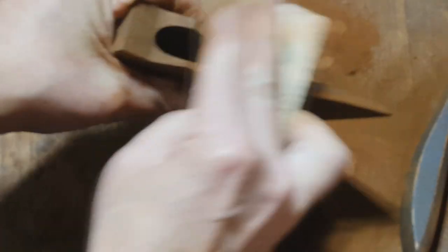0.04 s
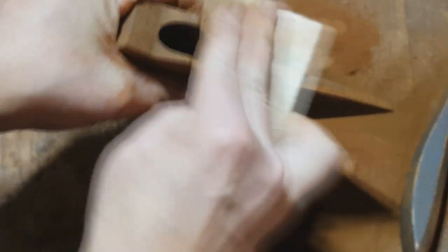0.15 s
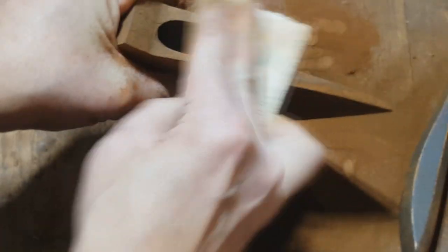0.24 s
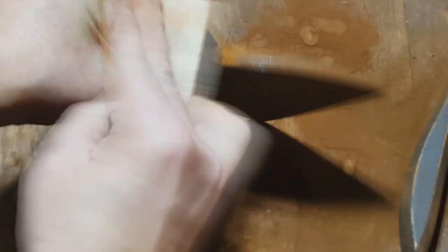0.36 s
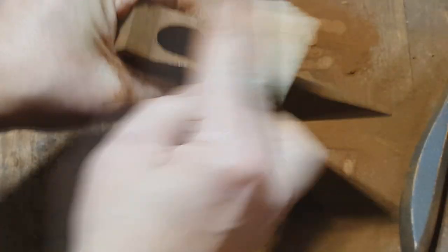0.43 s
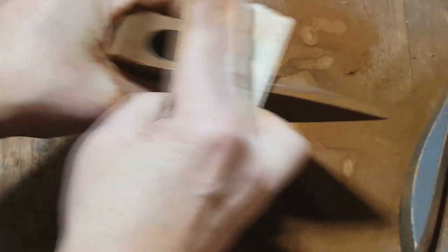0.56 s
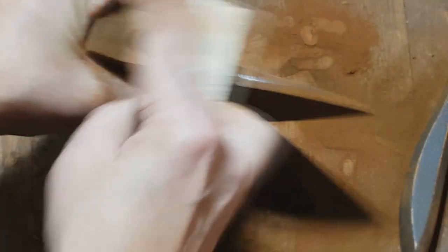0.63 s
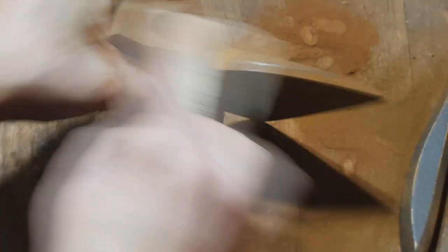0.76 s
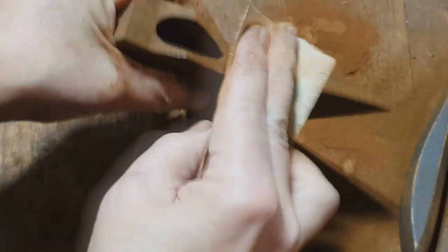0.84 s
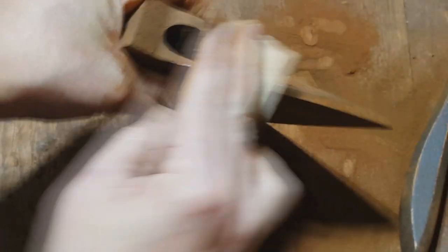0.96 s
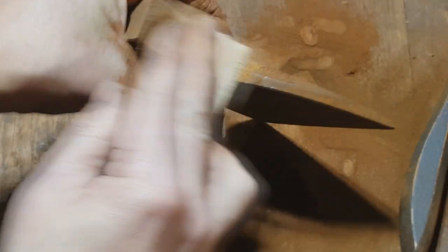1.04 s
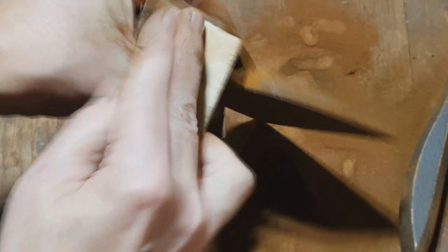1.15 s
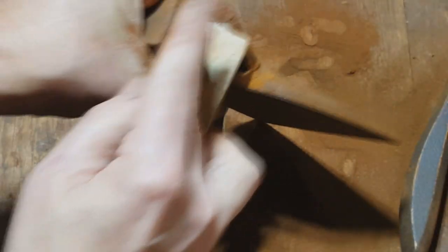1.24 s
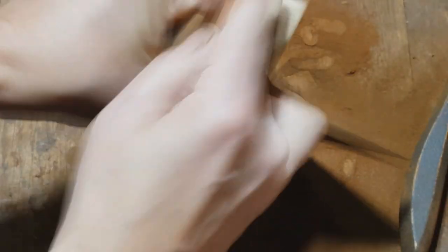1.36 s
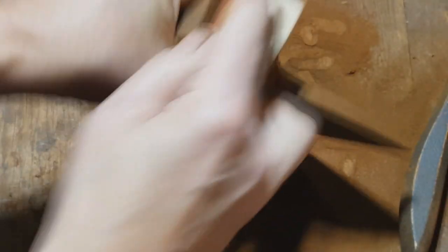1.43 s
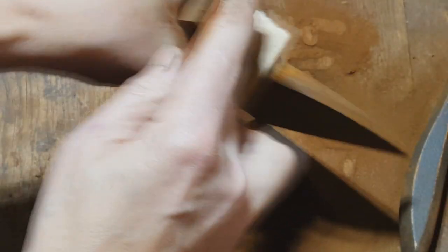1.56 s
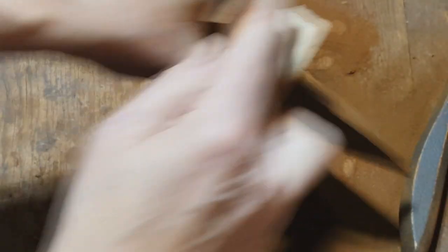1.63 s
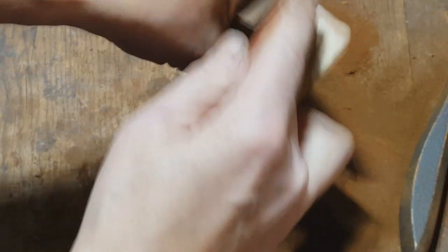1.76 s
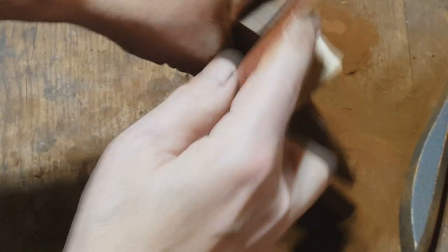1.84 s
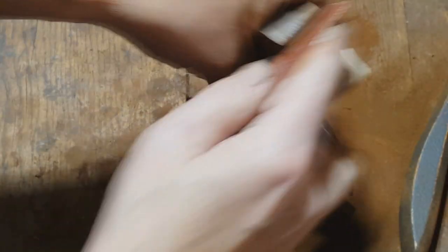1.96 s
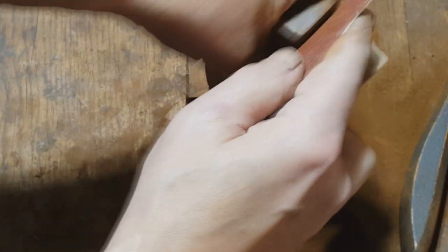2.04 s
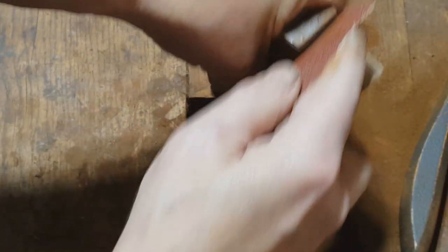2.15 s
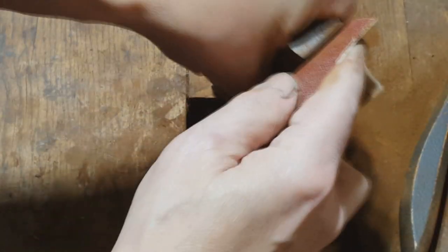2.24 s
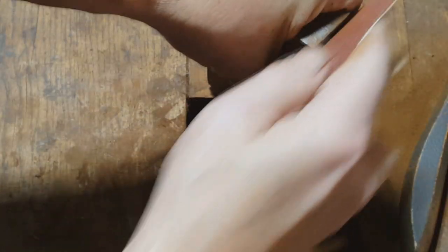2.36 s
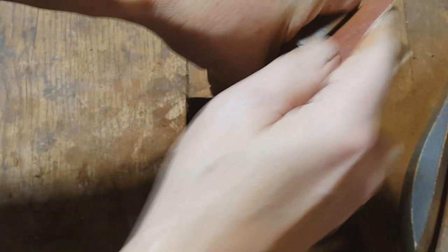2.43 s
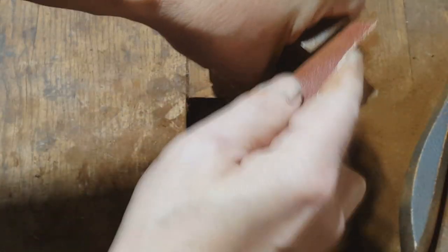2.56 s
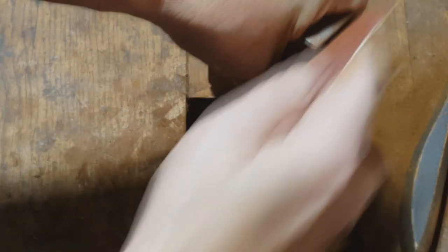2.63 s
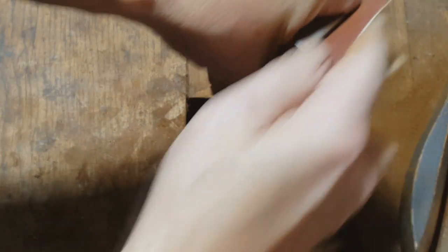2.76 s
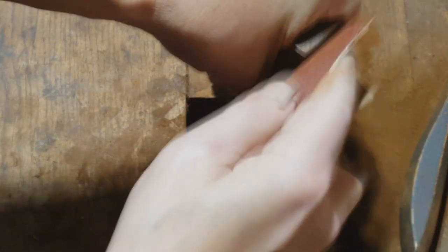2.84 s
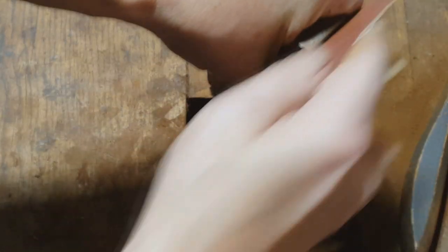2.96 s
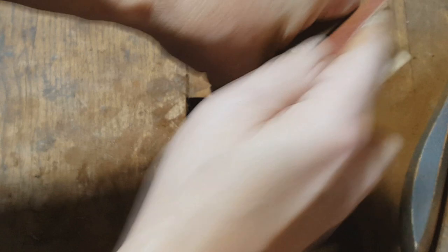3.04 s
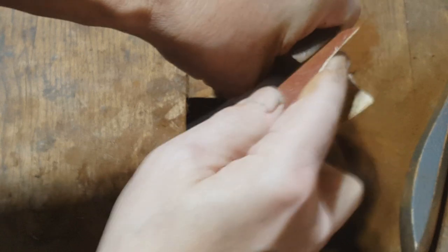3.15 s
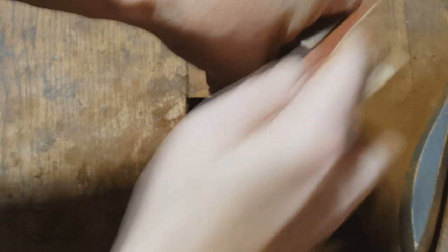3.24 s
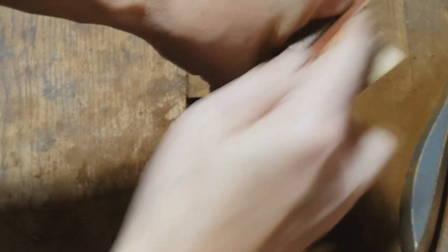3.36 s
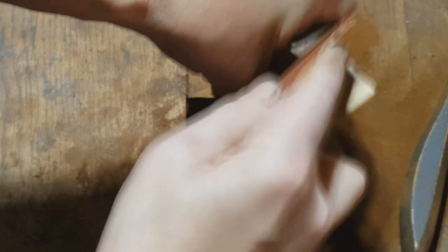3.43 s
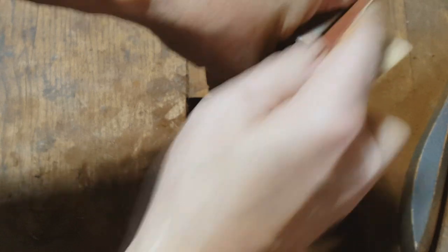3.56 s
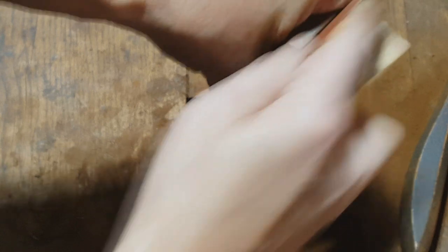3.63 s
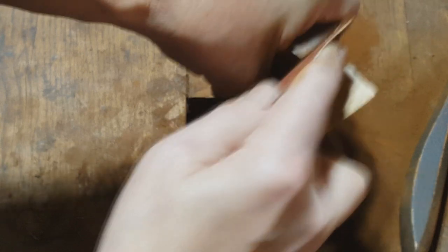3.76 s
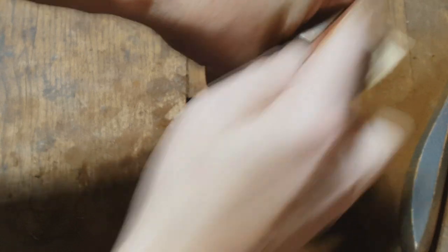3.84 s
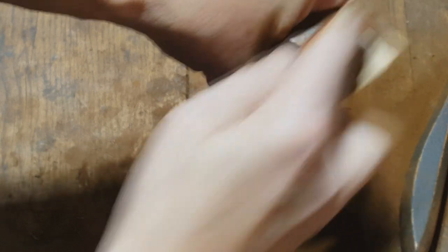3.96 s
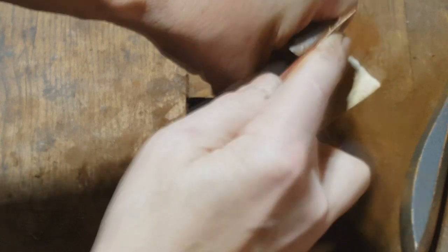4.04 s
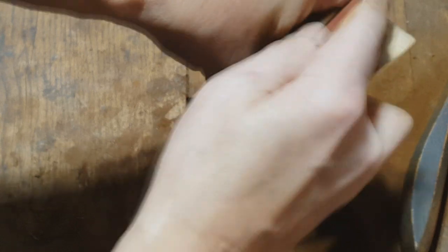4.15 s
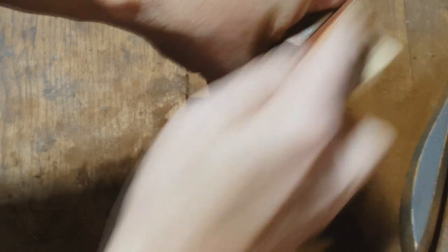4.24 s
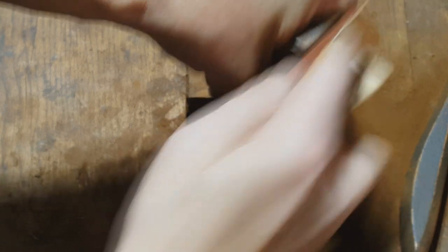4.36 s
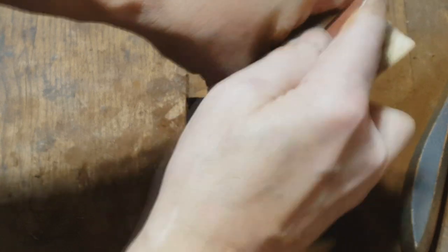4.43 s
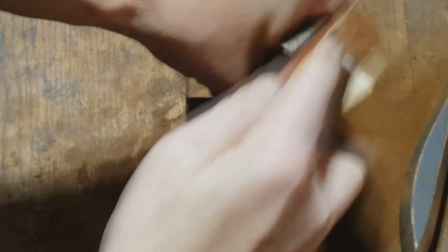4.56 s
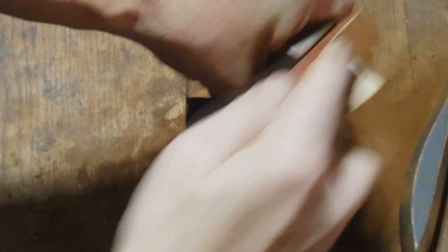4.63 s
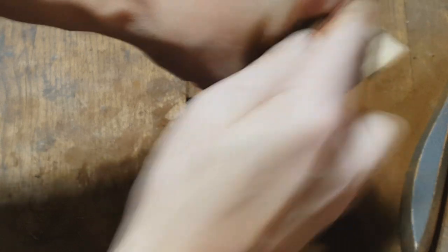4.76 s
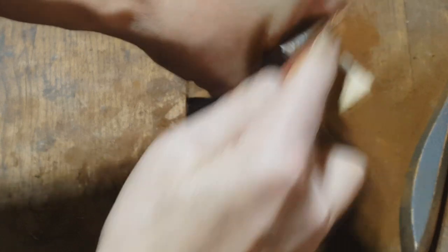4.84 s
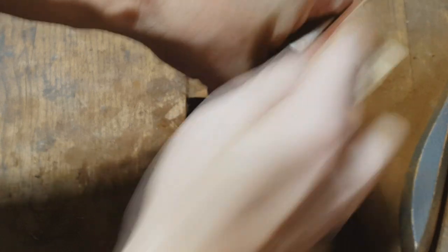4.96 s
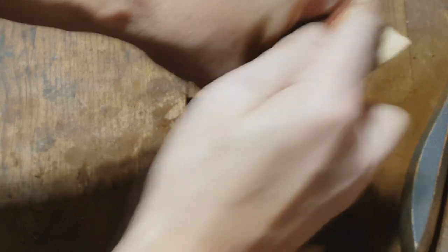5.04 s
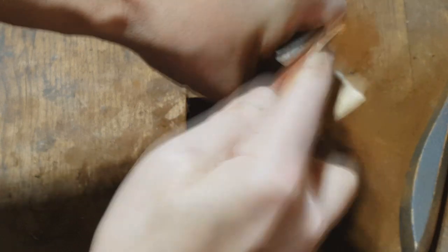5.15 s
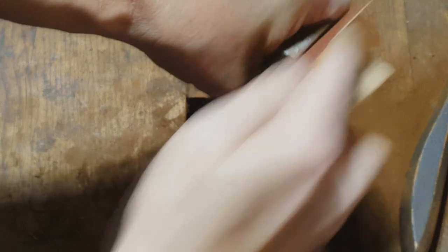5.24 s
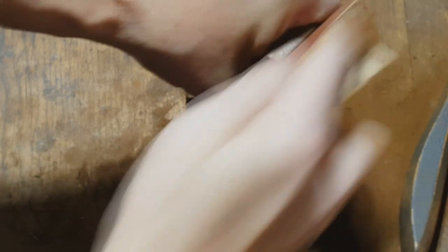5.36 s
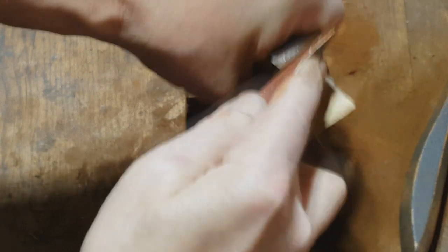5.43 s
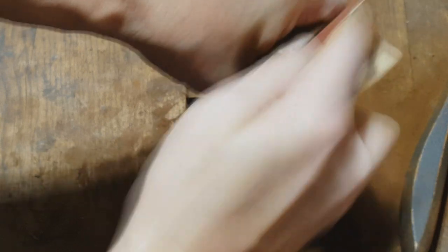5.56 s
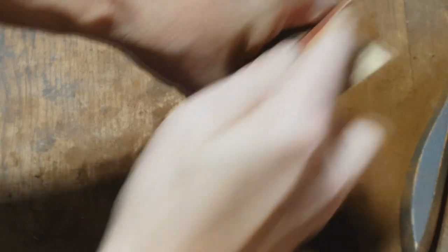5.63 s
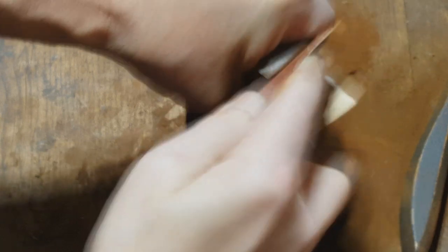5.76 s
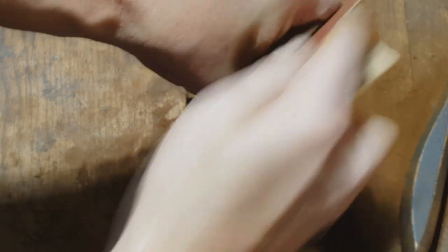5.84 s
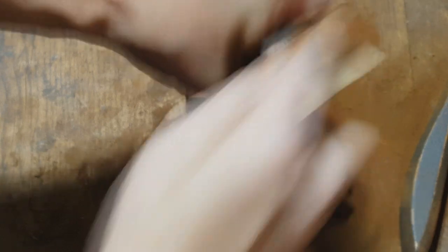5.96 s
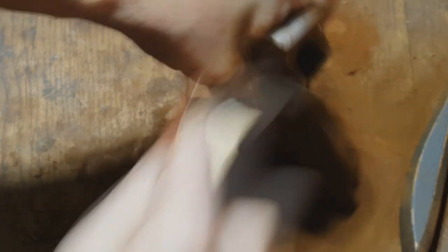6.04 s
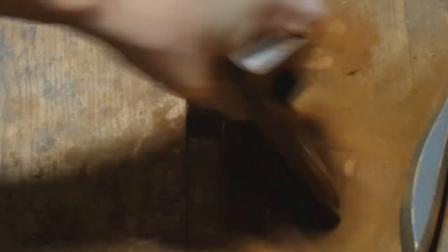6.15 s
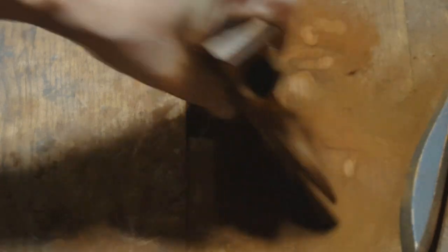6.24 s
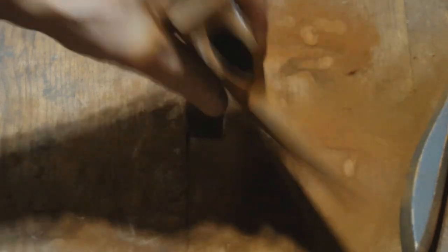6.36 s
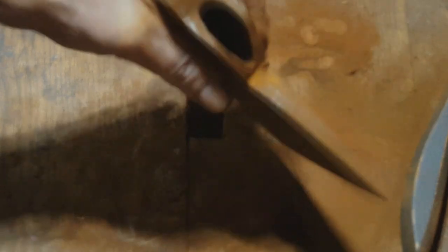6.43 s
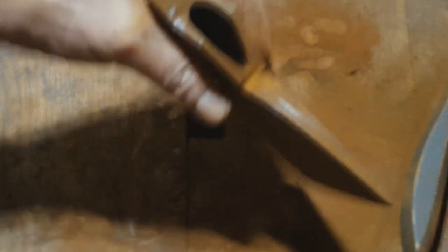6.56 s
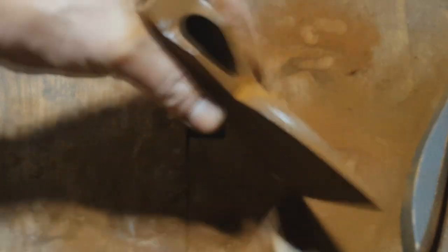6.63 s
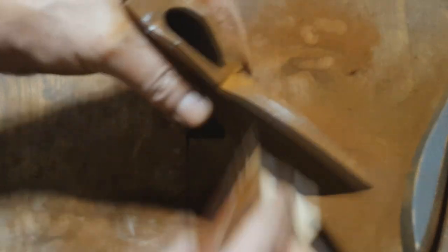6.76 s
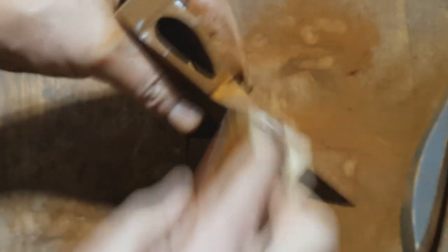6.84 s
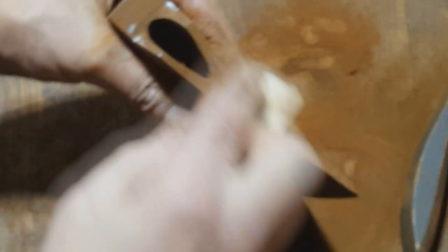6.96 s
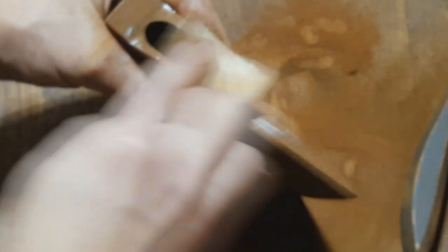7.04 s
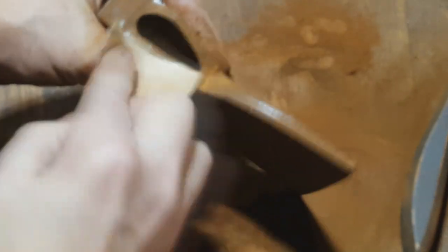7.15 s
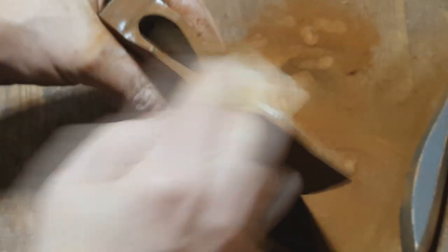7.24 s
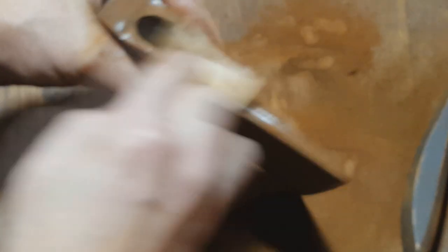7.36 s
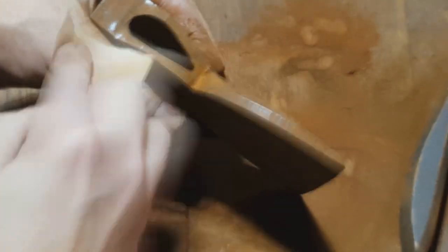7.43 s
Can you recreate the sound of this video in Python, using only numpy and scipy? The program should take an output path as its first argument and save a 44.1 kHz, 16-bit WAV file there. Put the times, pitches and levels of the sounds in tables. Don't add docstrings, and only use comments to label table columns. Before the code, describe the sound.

Sandpaper scrapes a hollow-eyed steel tool head in sharp bursts, then rapid even rubbing, before the head thumps on wood and two loud scrapes follow.

```python
import sys
import numpy as np
from scipy import signal
from scipy.fft import rfft, irfft, next_fast_len
from scipy.io import wavfile
from scipy.ndimage import uniform_filter1d, map_coordinates

SR = 44100
rng = np.random.default_rng(int(sys.argv[2]) if len(sys.argv) > 2 else 0)


def unload_audio(sound):
    columns = np.transpose(np.atleast_2d(sound))
    steps = np.round(np.clip(columns, -1, 1) * 32767)
    wavfile.write(sys.argv[1], SR, steps.astype(np.int16))


def ratio_of_db(decibels):
    return 10 ** (np.asarray(decibels, float) / 20)


N = 330309
TIME = np.arange(N) / SR

# start_s, length_s, peak_db, top_speed_at (0-1), eye_db
SINGLE_STROKES = [(-0.04, 0.097, -26, 0.67, -4), (0.048, 0.042, -19, 0.68, -18.5),
                  (0.114, 0.045, -23.5, 1, -15), (0.264, 0.011, -32, 0.26, 7),
                  (0.318, 0.16, -25.5, 0.67, -5), (0.672, 0.023, -56.5, 0.98, -1.5),
                  (1.024, 0.08, -23.5, 0.75, -7.5), (1.12, 0.15, -29, 0.56, -7),
                  (1.319, 0.11, -40, 0.74, -15.5), (1.472, 0.026, -49.5, 0.36, 1.5),
                  (1.496, 0.092, -45, 0.68, -4), (1.654, 0.073, -40.5, 0.74, 1),
                  (6.787, 0.095, -30.5, 0.61, -4), (7.053, 0.036, -27, 0.29, -11),
                  (7.086, 0.082, -29, 0.41, -8.5)]
# start_s, length_s, peak_db
RUN = [(2.042, 0.11, -35.5), (2.188, .12, -34), (2.346, 0.1, -32.5), (2.487, 0.1, -33), (2.639, .1, -31),
       (2.778, 0.11, -29.5), (2.946, 0.095, -29.5), (3.081, 0.1, -30), (3.235, 0.091, -29),
       (3.369, 0.099, -29), (3.533, 0.091, -26), (3.659, 0.095, -28), (3.812, 0.09, -26.5),
       (3.943, 0.095, -29), (4.083, 0.096, -26.5), (4.229, 0.096, -28.5), (4.371, 0.086, -27),
       (4.493, 0.1, -29.5), (4.655, 0.089, -26.5), (4.787, .11, -28), (4.939, 0.087, -27.5),
       (5.058, .12, -29.5), (5.22, 0.097, -27.5), (5.355, 0.11, -30), (5.514, 0.093, -27.5),
       (5.646, 0.13, -26.5)]
# top_speed_at (0-1), eye_db, fizz_db
PUSH = (0.73, -1.9, -4)
PULL = (0.43, -2.3, -4.5)
# top_speed_shift (0-1), eye_db
RUN_VARIATION = [(0.03, 0.0), (0, 1.5), (0.0, 1), (0.08, 1.5), (0.02, 1), (0, 1), (0, 1.5), (0, -1.5),
                 (0.01, 1), (0.06, -0.5), (0, -1.5), (0.03, 1.0), (0.03, 0), (0, -2), (0.09, 2), (-0.12, 1),
                 (0.04, 0), (0.02, 0), (0, 1), (0, 0.5), (0.02, 1), (0.01, 0.5), (0, -1.5), (0, 1.5),
                 (0.05, 0), (0, 0.5)]
RUN_EYE_TILTS = [.5, 1.5, 1, .5, .5, -.5, .5, .5, 2, 2, .5, -.5, .5, -.5, .5, -.5, -.5, -.5, -.5, .5, .5,
                 -.5, -.5, -.5, -.5, -.5]
START_DELAYS = [0.00074, 0.0034]
# eye_early_db, eye_late_db, grit_early_db, grit_late_db (tilt to the treble)
SINGLE_SLIDES = [(-2, 0, -1.5, 4), (5, 6.5, 4.5, -3), (7, 3.5, -5, -0.5), (4.5, 0, -8.5, -1),
                 (-1, 3.5, 4, -1.5), (0, 4, -6, -2.5), (1.5, -5.5, 2, -2.5), (-2.0, -6, -1.5, 2),
                 (8, -1.0, -1, 1.5), (3, 1, 0.5, 0.0), (1, 5.0, 1.5, 1.5), (-2, 2, 2, 0.0),
                 (1.5, 0, 3, 0.5), (-2.0, -4, 0, -5), (1, -2, 1.5, -2.5)]
PUSH_SLIDE = (-1.9, -1.2, -2.4, .7)
PULL_SLIDE = (-.3, 0.6, 0.5, -1)
GRIP_CHANGES = [
    1.44,
    6.3,
]
STROKE_FIZZ = [-10, -6, -4.5]
TOUCH_FIZZ = [-7.5, -1, -4.5]
# peak_s, peak_db, rise_db_per_s, fall_db_per_s, eye_db
TOUCHES = [(0.519, -55, 900, 157, -1), (0.735, -51, 403, 218.5, 1), (0.917, -44, 602, 293, -13),
           (1.021, -43.5, 1402, 901, -5), (1.725, -38, 900, 360, -3), (1.85, -65, 40, 104, -9),
           (1.922, -48.5, 176, 280, 6.5), (1.96, -48.5, 150, 502, -15), (2.055, -50, 593, 900, -8),
           (5.85, -70, 898, 300, 11), (5.97, -73, 30.5, 59, 9), (6.05, -66.5, 59, 137, 1),
           (6.218, -73, 800, 253, -6), (6.371, -52, 2499, 250, -1), (6.461, -61, 46, 500, -4),
           (6.65, -61, 630, 830, 5), (6.694, -77, 480, 240, 12), (6.755, -37.5, 5997, 700, 3.5),
           (6.798, -50.5, 284, 1496, 6), (6.95, -68, 900, 618, -10), (6.992, -57.5, 1200, 500, -1),
           (7.25, -83, 900, 168, -4), (7.312, -68.5, 120, 221, -1)]
# time_s, low_grit_db
PRESS = [(0, -16.5), (.3, -6.5), (.45, -25.5), (.75, -12), (.92, 1), (1.15, -20), (1.38, 2), (1.5, -9.5),
         (1.9, -4), (2.4, -14.5), (4.6, -17.5), (5.95, -15), (6.03, 4.5), (6.5, 2), (6.85, -14.5),
         (7.49, -22)]
# freq_hz, density_db (per Hz)
EYE_SIDE_COLOUR = [(88, -51), (150, -17), (422, -5.5), (805, -6.5), (871, -12), (941, -11.5), (1080, -12.5),
                   (1600, -6.5), (1870, -14), (5250, -17.5), (10000, -21), (12900, -19.5), (16000, -25.5)]
CHEEK_COLOUR = [(100, -70.5), (170, -27), (253, -26), (337, -12.5), (392, -15), (596, -10), (996, -21),
                (1400, -6), (1570, -6), (2300, -7), (3630, -6.5), (10500, -19.5), (12700, -18),
                (16000, -26)]
BLADE_COLOUR = [(150, -64.5), (250, -31), (348, -16.5), (414, -19), (618, -10), (1180, -11.5), (1550, -6),
                (1760, -11), (2860, -1.5), (4650, -13.5), (9010, -10.5), (10000, -17), (16000, -15.5)]
# freq_hz, width_hz, level_db
HELD_STEEL = [(814, 17, 4), (934, 23, 1.5), (1605, 290, -8.5), (2120, 81, -54), (3190, 3.3, 9),
              (3624, 7.7, -7.5), (5100, 290, -19), (6000, 55, -21.5), (323, 6.7, -1)]
# start_s, length_s, level_db, from_hz, to_hz
SWISHES = [(.035, 0.051, -26.5, 4970, 5470), (0.062, 0.052, -26.5, 2900, 3220),
           (0.137, 0.037, -35, 2490, 3545), (0.377, 0.079, -27.5, 6000, 4550),
           (0.418, 0.063, -31, 3846, 1908), (1.062, .045, -28, 3870, 3080), (1.168, 0.081, -37, 4300, 3550),
           (6.808, 0.073, -33, 1683, 2506), (7.052, 0.033, -33, 2720, 3300),
           (7.096, 0.067, -31, 1900, 2690), (7.097, 0.037, -37.5, 8540, 7960)]
# level_db (against the stroke), from_hz, to_hz
PUSH_WHISTLE = (-7.5, 1620, 1380)
PULL_WHISTLE = (-6.5, 1450, 1720)
# time_s, peak_db, crack_db
TAPS = [(.0812, -20.5, -5), (.2654, -3, -11.5), (.2725, -20, -6.5), (.4255, -13.5, -1.5), (.4705, -15.5, 3),
        (1.3492, -22, 6.5), (1.4802, -53, 7), (4.7342, -39, 0.5), (5.7452, -7, 1), (5.741, -17.5, 0),
        (6.7504, -18.5, 2), (7.0504, -14, 9), (7.0702, -13, 0.5), (7.119, -28, 5), (7.15, -23, 4)]
# freq_hz, level_db, t60_s
EYE_MODES = [(380, -11, .015), (620, -8, .012), (926, -4, .015), (1250, -1.5, .012), (1604, -1.5, .018),
             (1900, -7, .008)]
# time_s, peak_db
THUDS = [
    (6.365, -16),
    (6.3725, -37),
    (6.3835, -23.5),
    (6.3895, -25),
    (6.4005, -29.5),
    (6.419, -41),
    (6.431, -44),
    (6.4445, -40),
]
# freq_hz, level_db, t60_s
BENCH_MODES = [(70, -15, .1), (100, -8, .09), (135, -3, .09), (200, -4, .05), (264, -2.5, .035),
               (340, -1.5, .035), (450, -8, .03), (700, -19, .03), (1200, -32, .03)]
# time_s, peak_db
BUMPS = [
    (1.422, -33),
    (1.446, -33),
    (1.534, -29),
    (1.553, -33),
    (6.322, -46),
]
# freq_hz, level_db, t60_s
SOFT_BENCH_MODES = [(120, -2, .07), (160, -3, .06), (230, -9, .04)]
# time_s, peak_db
NUDGES = [
    (6.012, -43),
    (6.027, -40),
    (6.043, -40),
    (6.058, -41),
    (6.09, -49),
]
# start_s, freq_hz, level_db, t60_s
LIFTED_STEEL = [(6.02, 1787, -70, .1), (6.018, 2396, -54, .14), (6.03, 2880, -58, .24),
                (6.03, 4295, -66, .16), (6.042, 5771, -60, .17), (6.015, 6514, -67, .11),
                (6.03, 8625, -70, .26), (6.028, 10083, -70, .15)]
# freq_hz, level_db, t60_s
LANDED_STEEL = [(2880, -57, .12), (4400, -51, .13), (5771, -56, .1), (6600, -49, .05), (7000, -54, .1),
                (8625, -54, .1), (10500, -56, .05)]
# time_s, peak_db, pitch_hz
TICKS = [(1.83, -38, 11000), (6.212, -66, 5950), (6.324, -59, 1100), (6.345, -64, 2500),
         (6.506, -50.5, 2100), (6.527, -34, 8900), (6.5275, -55, 13000), (6.5475, -49, 3220),
         (6.635, -57, 1975), (6.649, -48, 3000), (6.684, -49.5, 3300), (6.685, -52, 1900),
         (6.698, -50, 2600), (6.733, -54, 2600), (6.72, -65, 2000)]
# time_s, peak_db, pitch_hz
SNAGS = [(.0588, -17, 1610), (.1431, -18.5, 1700), (.1526, -20, 2780), (.3468, -28.5, 1490),
         (.3643, -14.5, 1770), (1.0328, -47, 1540), (1.0447, -38, 1400), (1.0537, -23, 3800),
         (1.0662, -19, 1410), (1.081, -16, 1580), (1.0905, -17, 3000), (1.14, -27, 1740),
         (1.1789, -15, 1500), (1.197, -20, 4500), (1.5422, -28, 4070), (1.6684, -44, 4790),
         (1.6864, -38, 4480), (1.8351, -40, 12100), (1.8695, -46, 4040), (1.8949, -45, 4160),
         (1.9523, -27, 8840), (6.8008, -30.5, 2100), (6.8208, -15.5, 2660), (6.8262, -14.5, 1560),
         (6.842, -16, 1890), (6.854, -28, 2500), (7.0613, -19.5, 3200), (7.0673, -12.5, 3480),
         (7.0982, -19.5, 2590), (7.127, -14.5, 2100)]
# freq_hz, t60_s
ROOM_DECAY = [(150, 0.38), (900, 0.27), (1400, 0.18), (2500, 0.24), (5000, 0.19), (14000, 0.19)]
# freq_hz, density_db (per Hz)
AIR_COLOUR = [(12, -44.5), (20, -16), (27, -20.5), (101, -20.5), (113, -26), (134, -25), (172, -12.5),
              (1030, -31), (1710, -29.5), (6180, -42.5), (10200, -52.5), (12800, -47), (16000, -47)]
# middle_s, half_length_s, level_db
HUM_SWELLS = [(.33, 0.16, -60), (1.2, .13, -58), (1.85, 0.26, -60), (2.4, 0.27, -58), (3.1, .15, -60),
              (3.75, 0.29, -62), (4.45, 0.067, -65.5), (5.15, .3, -64), (5.74, .08, -62.5),
              (6.85, .12, -70.5), (7.15, .1, -73)]
# middle_s, half_length_s, level_db
ROCK_SWELLS = [(0, 0.024, -60), (.37, 0.074, -68.5), (1.05, 0.043, -71), (1.52, 0.17, -70),
               (3.58, 0.052, -58.5), (4.12, 0.075, -57.5), (4.44, 0.067, -58.5), (5.15, 0.66, -59.5),
               (6.049, 0.029, -60), (6.85, 0.21, -60.5), (7.08, 0.07, -63)]
# middle_s, half_length_s, level_db
DRAG_SWELLS = [
    (.1, .1, -60.5),
    (0.397, 0.077, -49.5),
    (1.43, 0.078, -58),
    (1.56, 0.0454, -52.5),
    (1.85, 0.19, -60),
    (3.9, 1, -62),
    (6.06, 0.015, -60.5),
    (6.7, .08, -61.5),
]
# freq_hz with likeness (0-1), left_over_right_db, left_lead_rad
PORT_LIKENESS = [(60, 0.72), (180, 0.59), (550, 0.91), (1650, 0.89), (4970, 0.74), (15000, 0.06)]
PORT_BALANCE = [(60, 0.5), (150, -1.5), (380, 4), (950, 3.5), (2380, 2), (5980, 1.0), (15000, -2.5)]
PORT_LEAD = [(0, -0.04), (1640, -0.32), (3010, -1.13), (3360, 0.89), (5000, -0.94), (8700, -1.4),
             (16100, -0.88)]


def sanding():
    eye, body, fizz = stroke_levels()
    catches = ratio_of_db(0.93 * wobble(900) + 0.15 * wobble(120) + 0.74 * wobble(35))
    grit = unit(catches * noise_pair(patchy_db=1.9, drift_db=.9))
    steady = unit(catches * noise_pair(patchy_db=-2.2, drift_db=1.5))
    grit, steady = filtered(np.array([grit, steady]), held_response)
    grip = np.searchsorted(GRIP_CHANGES, TIME)
    eye_db, body_db = slides()
    pressed = np.sqrt(eye * body) * ratio_of_db(curves(PRESS)[0])
    # level, noise, low_hz, high_hz, tilt_hz, tilt_db
    layers = [
        (pressed, grit, 0, 1100, 0, 0),
        (eye, steady, 1100, 2000, 1500, eye_db),
        (body, grit, 2000, 7000, 3800, body_db),
        (fizz, grit, 7000, SR, 0, 0),
    ]
    colours = (EYE_SIDE_COLOUR, CHEEK_COLOUR, BLADE_COLOUR)
    out = np.zeros((2, N))
    for level, source, lo_hz, hi_hz, middle_hz, tilt_db in layers:
        response = lambda f: np.array([[ratio_of_db(along(c, f))] for c in colours]) * band(f, lo_hz, hi_hz)
        whole = np.choose(grip, [unit(c) for c in filtered(source, response)])
        if middle_hz:
            low = signal.filtfilt(*signal.butter(3, middle_hz, fs=SR), whole)
            whole = low * ratio_of_db(-tilt_db) + (whole - low) * ratio_of_db(tilt_db)
        out += level * whole
    return out


def held_response(hz):
    power = 1
    for centre_hz, width_hz, db in HELD_STEEL:
        half = width_hz / 2
        power = power + ratio_of_db(db + 10.0) * half ** 2 / ((hz - centre_hz) ** 2 + half ** 2)
    return np.sqrt(power)


def stroke_levels():
    power = np.zeros((3, N))
    for s, length, db, top, eye_db, fizz_db in all_strokes():
        span = slice(max(round(s * SR), 0), round((s + length) * SR))
        u = np.clip((TIME[span] - s) / length, 0, 1)
        k = np.clip(top, .05, .95)
        speed = (u / k) ** k * ((1 - u) / (1 - k)) ** (1 - k)
        eye = ratio_of_db(db + eye_db) * speed ** 1.18
        body = ratio_of_db(db) * speed ** 2.08
        fizz = ratio_of_db(db + fizz_db) * speed ** 2.48
        power[:, span] += np.array([eye, body, fizz]) ** 2
    release_s = 0.0044
    fade = np.exp(-1 / (release_s * SR))
    power = np.maximum(power, signal.lfilter([1 - fade], [1, -fade], power))
    return np.sqrt(power + np.abs(uniform_filter1d(touch_power(), size=120)))


def touch_power():
    power = np.ones((3, 1)) * ratio_of_db(-80.5) ** 2 * (TIME > 8)
    for s, db, rise, fall, eye_db in TOUCHES:
        span = slice(max(round(s * SR) - SR // 4, 0), round(s * SR) + SR // 2)
        late = TIME[span] - s
        level_db = db - 3.0 + np.where(late < 0, abs(rise) * late, -abs(fall) * late)
        fizz_db = TOUCH_FIZZ[np.searchsorted(GRIP_CHANGES, s)]
        power[:, span] += ratio_of_db(level_db + np.array([[eye_db], [0], [fizz_db]])) ** 2
    return power


def all_strokes():
    rows = [(*row, STROKE_FIZZ[np.searchsorted(GRIP_CHANGES, row[0])]) for row in SINGLE_STROKES]
    warm_up_db_per_s = 1.14
    for k, (s, length, db) in enumerate(RUN):
        top, eye_db, fizz_db = PULL if k % 2 else PUSH
        shift, extra_eye_db = RUN_VARIATION[k]
        louder_db = db + 29
        eye_db += extra_eye_db - 0.82 * louder_db + warm_up_db_per_s * (s - RUN[13][0])
        fizz_db -= 0.48 * louder_db
        if s == RUN[-1][0]:
            fizz_db += 4.5
        delay = START_DELAYS[k % 2]
        rows.append((s + delay, length - delay, db, top + shift, eye_db, fizz_db))
    return rows


def slides():
    rows = [(s, length, *tilt) for (s, length, *_), tilt in zip(SINGLE_STROKES, SINGLE_SLIDES)]
    for k, ((s, length, _), note) in enumerate(zip(RUN, RUN_EYE_TILTS)):
        eye_early, eye_late, grit_early, grit_late = PULL_SLIDE if k % 2 else PUSH_SLIDE
        rows.append((s, length, eye_early + note, eye_late + note, grit_early, grit_late))
    early = [(s + length / 4, eye, body) for s, length, eye, _, body, _ in rows]
    late = [(s + 3 * length / 4, eye, body) for s, length, _, eye, _, body in rows]
    eye_db, body_db = curves(sorted(early + late))
    return eye_db + 1.45 * wobble(30), body_db


def swishes():
    out = np.zeros((2, N))
    rows = list(SWISHES)
    for k, ((s, length, db), (_, eye_db)) in enumerate(zip(RUN, RUN_VARIATION)):
        whistle_db, from_hz, to_hz = PULL_WHISTLE if k % 2 else PUSH_WHISTLE
        rows.append((s, length, db + eye_db + whistle_db, from_hz, to_hz))
    for s, length, db, from_hz, to_hz in rows:
        u = TIME[:SR // 7] / length
        noise = rng.standard_normal((3, 2, SR // 7))
        ports = noise[0] + 0.4 * noise[1:]
        low = unit(signal.lfilter(*signal.butter(2, .13 * from_hz, fs=SR), ports))
        phase = 2 * np.pi * np.cumsum(from_hz + (to_hz - from_hz) * u) / SR
        whistle = low[:, 0] * np.sin(phase) + low[:, 1] * np.cos(phase)
        swell = np.sin(np.pi * np.clip(u, 0, 1))
        out[:, round(s * SR):][:, :len(u)] += ratio_of_db(db) * swell * whistle
    return out


def knocks():
    taps = ring(TAPS, EYE_MODES, crack_db=-1.5, attack=.0004, spread_db=1.5)
    thuds = ring(THUDS, BENCH_MODES, crack_db=-36, attack=.0015, spread_db=2.5)
    bumps = ring(BUMPS, SOFT_BENCH_MODES, crack_db=-50, attack=.006, spread_db=1.5)
    nudges = ring(NUDGES, BENCH_MODES[4:8], crack_db=-40, attack=.004, spread_db=3)
    lift = np.zeros(N)
    for s, *mode in LIFTED_STEEL:
        lift += ring([(s, 0)], [mode], crack_db=-90, attack=.025, spread_db=0)
    lift *= ratio_of_db(1.5 * wobble(60))
    landing = ring([(THUDS[0][0], 0)], LANDED_STEEL, crack_db=-44, attack=.0005, spread_db=0)
    return ratio_of_db(-10.5) * taps + ratio_of_db(-2) * thuds + bumps + nudges + ratio_of_db(9.5) * lift + landing + ticks()


def ring(hits, modes, crack_db, attack, spread_db):
    out, t = np.zeros(N + SR), TIME[:SR // 3]
    for s, db, *colour_db in hits:
        tone = np.zeros(len(t))
        for k, (hz, level, t60) in enumerate(modes):
            mode_db = level + spread_db * rng.normal() - 60 * t / t60
            tone += (-1) ** k * ratio_of_db(mode_db) * np.sin(2 * np.pi * hz * t)
        burst = uniform_filter1d(rng.standard_normal(len(t)), size=3)
        crack = ratio_of_db(crack_db + sum(colour_db) - 60 * t / 0.01) * burst
        out[round(s * SR):][:len(t)] += ratio_of_db(db) * (tone * (1 - np.exp(-t / attack)) + crack)
    return out[:N]


def ticks():
    out, t = np.zeros(N), TIME[:600]
    for s, db, hz in TICKS + SNAGS:
        envelope = ratio_of_db(db + 8 - 60 * t * hz / 12) * (1 - np.exp(-t * hz / 1.5))
        out[round(s * SR):][:len(t)] += envelope * np.sin(2 * np.pi * hz * t)
    return out


def shop(x):
    hz, t, z = signal.stft(rng.standard_normal((2, SR // 2)), SR, nperseg=256)
    decay = ratio_of_db(-60 * t / along(ROOM_DECAY, hz)[:, None])
    tail = signal.istft(z * decay, SR, nperseg=256)[1]
    tail[1] += signal.lfilter(*signal.butter(2, 700, fs=SR), tail[0] - tail[1])
    tail = tail / np.linalg.norm(tail[0])
    delayed = np.pad(x, (150, 0))[None]
    return signal.fftconvolve(delayed, tail, axes=1)[:, :N]


def background():
    air = unit(filtered(noise_pair(patchy_db=-4.5, drift_db=-1.0), lambda f: ratio_of_db(along(AIR_COLOUR, f))))
    hum_tone = np.sin(2 * np.pi * np.cumsum(49 + 1.9 * wobble(3.3)) / SR)
    hum = swells(-73.5, HUM_SWELLS) * (0.72 * narrow(60, 7) + 1.23 * hum_tone)
    stroke_rock = ratio_of_db(-36) * uniform_filter1d(stroke_levels()[1], size=2000)
    rock = np.hypot(swells(-69, ROCK_SWELLS), stroke_rock) * narrow(121, 20)
    drag = swells(-78, DRAG_SWELLS) * narrow(270, 120)
    return ratio_of_db(-65.5) * air + hum + rock + drag


def narrow(centre_hz, width_hz):
    noise = rng.standard_normal(N)
    return unit(filtered(noise, lambda f: 1 / (1 + ((f - centre_hz) / width_hz) ** 2)))


def swells(rest_db, rows):
    power = ratio_of_db(rest_db) ** 2
    for s, half, db in rows:
        power = power + ratio_of_db(db) ** 2 * np.exp(-((TIME - s) / half) ** 2)
    return np.sqrt(power)


def noise_pair(patchy_db, drift_db):
    z = signal.stft(rng.standard_normal((2, N)), nperseg=256)[2]
    gain = ratio_of_db(patchy_db * patches(z.shape[1:], 4, 5) + drift_db * patches(z.shape[1:], 12, 14))
    pair = signal.istft(z * gain, nperseg=256)[1][:, :N]
    turn = lambda hz: np.arccos(np.clip(along(PORT_LIKENESS, hz), 0, 1)) / 2
    mid, side = filtered(pair, lambda hz: np.array([np.cos(turn(hz)), np.sin(turn(hz))]))
    return np.array([mid + side, mid - side])


def patches(shape, tall, long):
    field = uniform_filter1d(rng.standard_normal(shape), size=tall, axis=0)
    return unit(uniform_filter1d(field, size=long, axis=1))


def wobble(rate):
    return map_coordinates(rng.standard_normal(int(N * rate / SR) + 4), [TIME * rate])


def curves(rows):
    s, *cols = np.transpose(rows)
    return [np.interp(TIME, s, c) for c in cols]


def along(points, hz):
    f, v = np.transpose(points)
    return np.interp(np.log(hz + 1), np.log(f + 1), v)


def band(hz, lo_hz, hi_hz):
    return np.sqrt(1 / (1 + (lo_hz / (hz + 1)) ** 8) / (1 + (hz / hi_hz) ** 8))


def filtered(x, response):
    m = next_fast_len(N + 8192)
    return irfft(rfft(x, m) * response(np.fft.rfftfreq(m, 1 / SR)), m)[..., :N]


def unit(x):
    return x / np.sqrt(np.mean(x ** 2) + 1e-20)


def scene():
    grit, hits = sanding(), knocks()
    to_room = grit.mean(axis=0) + ratio_of_db(-4) * hits
    return grit + swishes() + hits + ratio_of_db(-7.5) * shop(to_room) + background()


def low_pass(x):
    return signal.sosfilt(signal.butter(12, 16500, fs=SR, output="sos"), x)


def record(dry):
    balance = lambda f: ratio_of_db(along(PORT_BALANCE, f)) * np.exp(1j * along(PORT_LEAD, f))
    port = lambda f: balance(f) ** np.array([[.5], [-.5]])
    limit = lambda f: 1 / (1 + (f / 15750) ** 150)
    hiss = ratio_of_db(-80.0) * np.diff(rng.standard_normal((2, N + 1)))
    mix = filtered(dry + hiss, lambda f: port(f) * limit(f)) - .0006
    return low_pass(mix)


dry = scene()
out = record(dry)
unload_audio(out)
```